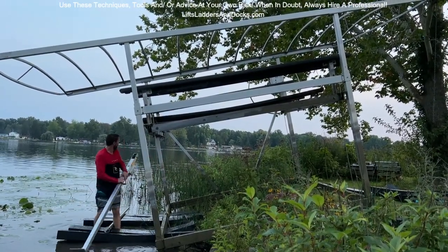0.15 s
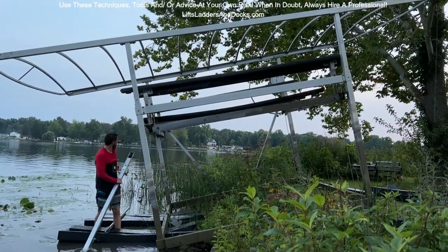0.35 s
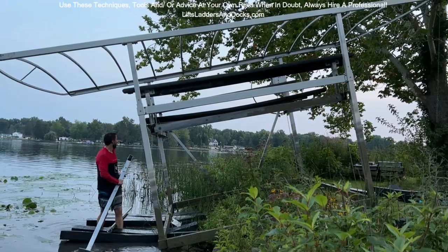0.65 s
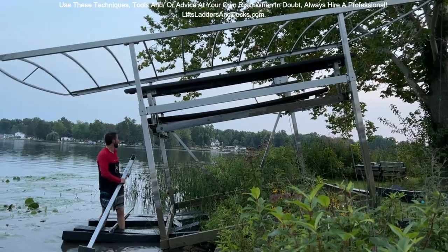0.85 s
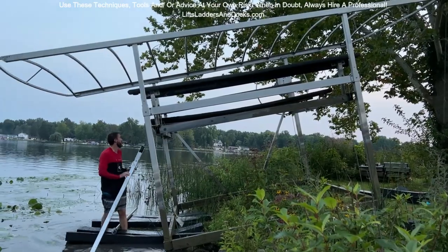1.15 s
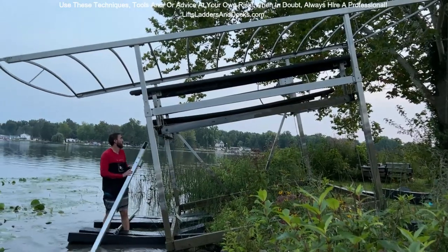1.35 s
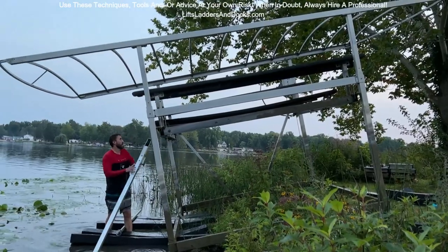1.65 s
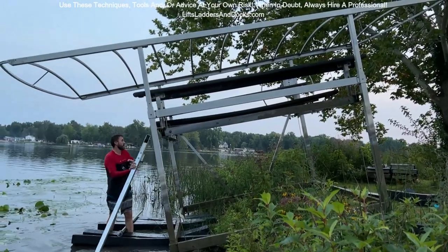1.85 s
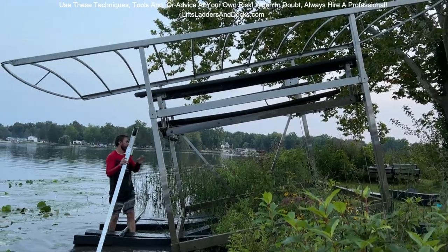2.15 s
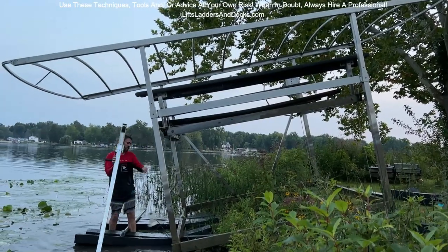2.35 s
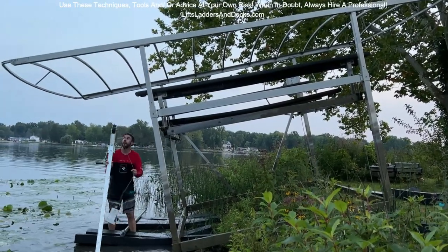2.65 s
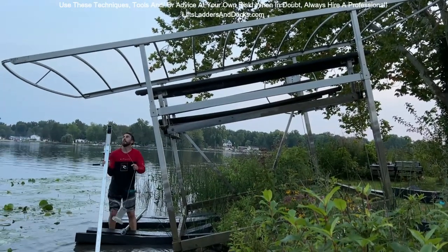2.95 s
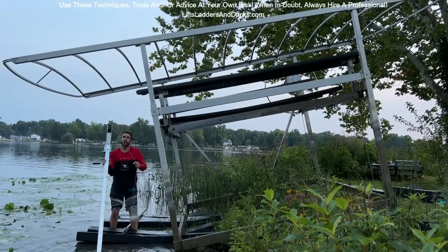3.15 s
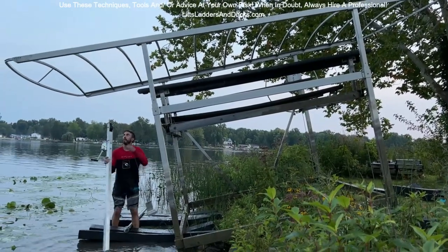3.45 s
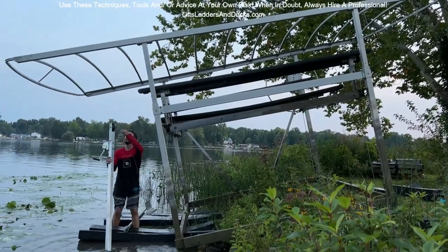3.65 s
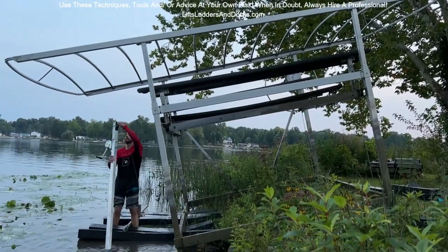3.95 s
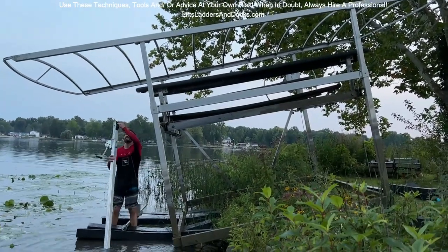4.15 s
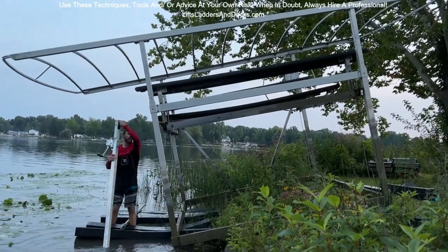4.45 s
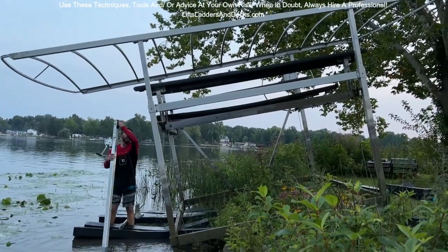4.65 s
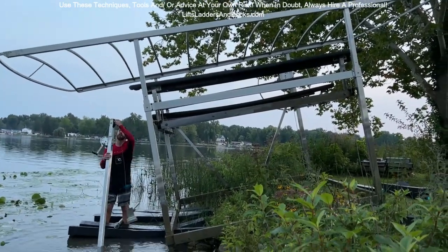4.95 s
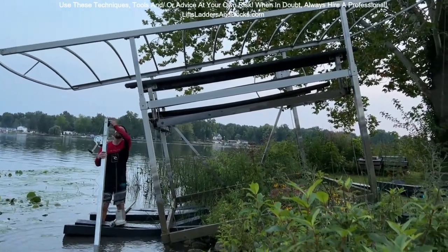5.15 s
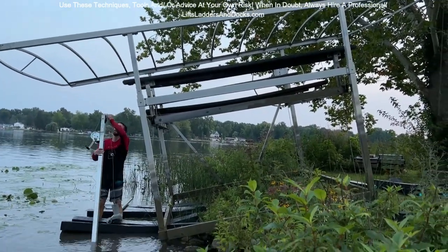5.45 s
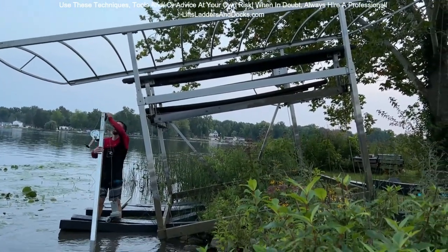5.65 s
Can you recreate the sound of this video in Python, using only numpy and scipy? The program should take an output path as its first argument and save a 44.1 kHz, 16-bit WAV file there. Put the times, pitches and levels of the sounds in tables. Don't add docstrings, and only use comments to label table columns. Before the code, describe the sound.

Sharp ringing metal clanks, short scrapes and a late bouncing rattle stand out against quiet high insect song and a low distant outdoor hum.

```python
import sys
import numpy as np
from scipy import signal
from scipy.fft import rfft, irfft, next_fast_len
from scipy.io import wavfile
from scipy.ndimage import uniform_filter1d

SR = 44100
rng = np.random.default_rng(int(sys.argv[2]) if len(sys.argv) > 2 else 0)


def volts(x):
    e = np.asarray(x, float) / 20
    return 10 ** e


def to_wav(s):
    ch = np.atleast_2d(s).T
    pcm = np.round(np.clip(ch, -1, 1) * 32767)
    wavfile.write(sys.argv[1], SR, pcm.astype(np.int16))


N = 255558
T = np.arange(N) / SR
THIRDS = 90 * 2 ** np.arange(0, 7.4, 1 / 3)
LEFT_RIGHT = np.array([[1], [-1]])


def shape(table, hz):
    f, v = np.transpose(table)
    return np.interp(np.log(hz), np.log(f), v)


def band(x, lo_hz, hi_hz, order=2):
    y = signal.sosfilt(signal.butter(order, [lo_hz, hi_hz], "band", fs=SR, output="sos"), x)
    return y / np.sqrt(np.mean(y ** 2))


def walk(rate):
    k = int(SR / rate)
    levels = np.repeat(rng.standard_normal(N // k + 1), k)
    return uniform_filter1d(uniform_filter1d(levels, k), k)[:N]


def swell(start, end, level_db, rise, fall):
    return volts(level_db - rise * np.maximum(start - T, 0) - fall * np.maximum(T - end, 0))


def gliding_noise(hz, rate):
    phase = 2 * np.pi * np.cumsum(hz) / SR
    noise = walk(rate) * np.sin(phase) + walk(rate) * np.cos(phase)
    return noise / np.std(noise)


# pitch in Hz, left minus right in dB, lead of the left in radians
PORT_SHADE = [(300, 0, .12), (800, -1.5, .15), (1400, 0, .8), (2000, 1, 1.2), (2800, 4, 1.3),
              (4500, 5, 1.2), (5500, 6.5, .6), (6500, 4, .1), (8500, 0, -.2), (13500, 0, -.2),
              (14500, 0, 2.4)]


def ports(x, lean):
    size = next_fast_len(N + 64)
    hz = (np.arange(size // 2 + 1) + 1) * SR / size
    at, shade_db, lead = np.transpose(PORT_SHADE)
    shade = volts(lean * shape(np.c_[at, shade_db], hz) / 2)
    turn = np.exp(.5j * lean * shape(np.c_[at, lead], hz)) * shade
    spec = rfft(x, size)
    return np.array([irfft(spec * turn, size)[:N], irfft(spec / turn, size)[:N]])


def shimmer():
    noises = [band(rng.standard_normal(2 * SR), f / 1.12, f * 1.12) for f in THIRDS]
    return np.array(noises) * np.sqrt(THIRDS / 1000)[:, None]


def strike(blows, modes, colour, decay, cloud, clear_db, late_db, late_ratio, lead):
    out = np.zeros(N + 2 * SR)
    count = len(modes)
    hz, db, t60 = np.transpose(modes)[:, :, None]
    chance = rng.random((len(blows), 1 + 3 * count))
    for (s, peak_db, tilt_db, contact, share), c in zip(blows, chance):
        share = np.clip(share, .05, 1.5)
        t = T[:int(SR * np.clip((peak_db + 70) / 55, .1, 1))]

        def tilt(f):
            return volts(tilt_db * np.log2(f / 1000))

        def rise(f):
            return 1 - np.exp(-t / max(contact, 1e-4) * 2 * np.sqrt(np.maximum(f / 800, .6)))

        spot = volts(3.67 * (c[1:1 + count, None] - 4.5))
        phase = 2 * np.pi * c[1 + count:1 + 2 * count, None]
        fade = rise(hz) * np.exp(-np.log(1000) * t / np.minimum(t60, 1.9) / share)
        beat_hz = 6 + 25 * c[1 + 2 * count:, None]
        beat = 1 + .65 * np.cos(2 * np.pi * beat_hz * t + 3 * phase)
        gain = volts(db + clear_db) * spot * tilt(hz)
        clear = np.sum(gain * beat * fade * np.sin(2 * np.pi * hz * t + phase), axis=0)
        short = shape(decay, THIRDS)[:, None] * share
        fall = np.exp(-np.log(1000) * t / short)
        fall = fall + volts(late_db) * np.exp(-np.log(1000) * t / short / late_ratio)
        start = int(c[0] * SR * .9)
        piece = cloud[:, start:start + len(t)] * fall * rise(THIRDS[:, None])
        ring = clear + (volts(shape(colour, THIRDS)) * tilt(THIRDS)) @ piece
        ring *= np.minimum((t[-1] - t) / .05, 1)
        loudest = np.sqrt(np.max(uniform_filter1d(ring[:4000] ** 2, 200)))
        at = int((s - lead) * SR)
        out[at:at + len(t)] += ring * volts(peak_db - 0.5) / loudest
    return out[:N]


# pitch in Hz, density in dB per Hz
SHORE_COLOUR = [(18, -35), (36, -7), (60, 7.5), (86, -2.5), (365, -22), (467, -11.5), (700, -30.5),
                (883, -24), (2730, -30), (3240, -35), (4680, -33.5), (6750, -45), (8020, -34), (10500, -43),
                (13600, -74), (22000, -120)]


def shore():
    out, common = 0, walk(1.3)
    for hz in 25 * 2 ** np.arange(0, 9, .5):
        mid, side = (band(rng.standard_normal(N), hz / 1.19, hz * 1.19) for _ in range(2))
        db = shape(SHORE_COLOUR, hz) + 10 * np.log10(hz) + 1.2 * common + 2.2 * walk(8)
        wide = np.clip(0.12 + hz / 1500, 0, .85)
        out = out + volts(db) * (mid + wide * side * LEFT_RIGHT)
    return out * volts(-50.5) / np.std(out)


# full strength from and to in seconds, level in dB,
# rise in dB per s, fall in dB per s
CRICKET_SONG = [
    (0, .45, -66, 60, 60),
    (.72, 2.34, -55.5, 55, 50),
    (3.2, 3.3, -81, 5, 5),
    (4.5, 5.1, -65, 16, 200),
    (5.3, 5.8, -62, 60, 30),
]
CICADA_SONG = [
    (3.12, 3.3, -62, 12, 60),
]
REED_BUG_SONG = [
    (1.0, 1.5, -60.5, 11.4, 18),
    (3.8, 4.02, -63, 190, 69),
    (4.33, 4.5, -66, 61, 36),
]
WARM_UP = [.074, .177, .306, 3.3293, 3.4516, 3.5748, 3.692, 3.8157, 3.9379, 4.0572, 4.2068, 4.3251, 4.4498]


def insects():
    def song(rows):
        return sum(swell(*row) for row in rows)

    noise = rng.standard_normal((4, N))
    level = song(CRICKET_SONG) * (1 + .25 * np.sin(2 * np.pi * 28 * T + 3 * walk(5.8)))
    for s in WARM_UP:
        early = min(start - s for start in (.31, 4.5) if start > s)
        age = np.maximum(T - s + 0.01, 0)
        stroke = (1 - np.exp(-age / .006)) * np.exp(-age / 0.035) / 2
        level += volts(-53 - 14 * early + 8.0) * stroke
    wing = band(noise[0], 11350, 13200, order=3) + volts(-3.0) * band(noise[1], 14200, 15700, order=3)
    cicada = song(CICADA_SONG) * band(noise[2], 4700, 5600) * volts(2 * walk(20.0))
    bug = song(REED_BUG_SONG) * band(noise[3], 8210, 11000, order=3) * volts(1.2 * walk(25.6))
    spread = level * volts(-5.5) * band(noise[3], 11300, 13200, order=3) * LEFT_RIGHT
    return ports(level * wing + cicada + bug, lean=2.0) + spread


# start in seconds, peak in dB, bubble pitch in Hz, ring in seconds, glide as
DRIPS = [
    (.013, -55, 830, .018, .03),
    (.144, -50, 1100, .014, -.1),
    (.81, -54, 850, .025, .55),
    (1.1, -41, 930, .02, .06),
    (2.53, -59, 1400, .02, .12),
    (3.662, -47, 330, .018, .05),
    (4.12, -58, 1080, .04, .06),
    (5.605, -60, 1195, .07, 0),
    (5.763, -49.5, 850, .011, .08),
]


def drops():
    out, t = np.zeros(N + 4410), T[:4410]
    for s, peak_db, hz, ring, glide in DRIPS:
        note = np.sin(2 * np.pi * hz * (t + glide * t ** 2 / ring / 2))
        fade = np.minimum(t / 0.0031, 1) * np.exp(-(t / ring) ** 2)
        at = int(s * SR)
        out[at:at + 4410] += volts(peak_db + 4.5) * note * fade
    return out[:N]


# start in seconds, peak in dB, treble tilt in dB per octave,
# contact in seconds, ring share 0-1
NUDGE_BLOWS = [(.092, -49.5, -5, 0.012, 0.38), (.188, -49.5, 7, 0.0031, 0.42),
               (.305, -45.5, 13.5, 0.0065, 0.42), (.349, -45.5, 12, 0.0033, 0.15),
               (.949, -48.5, 3.5, 0.0025, 0.99), (1.127, -31.5, -3.5, 0.0011, 0.13),
               (1.14, -39, 9.5, 0.0032, 0.69), (1.189, -32, -2, 0.001, 0.89),
               (1.6, -35.5, -7, 0.0038, 0.22), (1.666, -44.5, -1.5, 0.001, 0.2),
               (1.696, -33.5, 0.5, 0.004, 0.86), (1.96, -37, -3, 0.015, 0.38)]
# pitch in Hz, level in dB,
# t60 in seconds
BRIGHT_END = [(133, -15, .59), (265, -17, .63), (608, 1, .26), (662, -1, .33), (690, -18, .44),
              (786, -21, 1.2), (883, -6, .5), (996, -16, .8), (1098, -18, .65), (1179, -11, .4),
              (1330, 0, .18), (1400, -7, .3), (1604, -8, .24), (1733, -10, .27), (2169, -12, .2)]
WHOLE_BEAM = [(361, -23, 1.8), (372, -28, 1.4), (426, -30, 1.5), (441, -27, 1.7), (716, -2, .15)]
# pitch in Hz, density in dB per Hz
BRIGHT_END_COLOUR = [(53, -55), (90, -27.5), (515, -9.5), (639, -5), (1120, -14), (1330, -10.5),
                     (2710, -26.5), (5630, -33), (9240, -53), (10100, -81), (11500, -49), (15500, -61)]
# pitch in Hz, t60 in seconds
BEAM_FADE = [(100, 0.32), (400, 0.21), (800, 0.24), (2000, 0.14), (5000, 0.086), (12000, 0.05)]


def nudges(cloud):
    return strike(NUDGE_BLOWS, BRIGHT_END + WHOLE_BEAM, BRIGHT_END_COLOUR, BEAM_FADE, cloud,
                  clear_db=3.5, late_db=-7.0, late_ratio=8.9, lead=.0015)


# start in seconds, level in dB, pitch in Hz,
# held in seconds, t60 in seconds
TOUCHES = [(.404, -12, 617, .041, .03), (5.2, -49, 2865, .05, 1.5), (2.75, -55, 2725, .1, 1.2),
           (.144, -54, 1300, .006, .04), (5.6, -58, 1195, .06, .1), (5.5, -55, 1700, .01, .04),
           (1.12, -50, 2400, .01, .05), (1.17, -48, 1650, .012, .05), (1.42, -42, 790, .065, .08),
           (1.6, -40, 620, .02, .1), (1.598, -50, 1800, .004, .06), (1.666, -43, 680, .008, .05),
           (1.698, -34, 660, .008, .03), (1.712, -32, 660, .01, .06), (1.697, -46, 4900, .004, .08),
           (1.735, -42, 595, .065, .08), (1.85, -46, 272, .03, .08), (1.9, -45, 272, .03, .08),
           (1.875, -50, 3560, .02, .12), (1.9, -44, 540, .02, .06), (1.935, -42, 485, .07, .1),
           (3.218, -58, 3050, .008, .05), (4.17, -59, 1090, .04, .06), (4.26, -60, 1950, .05, .06),
           (4.2, -58, 300, .06, .1), (1.128, -42, 480, .004, .04), (1.19, -42, 760, .004, .04),
           (4.158, -56, 1480, .008, .04), (4.2, -58, 1560, .015, .05), (4.335, -56, 800, .01, .05),
           (4.347, -46, 2750, .005, .07), (4.347, -51, 1800, .005, .07), (4.454, -58, 2800, .006, .05),
           (4.987, -53, 2800, .005, .05), (5.1492, -22, 1300, .0005, .01), (5.194, -26, 2000, .002, .02),
           (5.259, -38, 4750, .003, .04), (5.36, -38, 960, .006, .04), (5.366, -39, 398, .014, .1)]


def held():
    out, t = np.zeros(N + SR), T[:SR // 2]
    for s, db, hz, hold, t60 in TOUCHES:
        rise = np.minimum(t * hz / 2, 1)
        fade = rise * np.exp(-np.log(1000) * np.maximum(t - hold, 0) / max(t60, .005))
        at = int(s * SR)
        out[at:at + len(t)] += volts(db + 3) * fade * np.sin(2 * np.pi * hz * t)
    return out[:N] * volts(1.5 * walk(150))


# start in seconds, peak in dB, treble tilt in dB per octave,
# contact in seconds, ring share 0-1
FIRST_BLOWS = [
    (0.404, -9, 1.5, 0.0093, 1.0),
    (.419, -17, 3., .002, .2),
    (.434, -17, 3., .002, .2),
]
# pitch in Hz, level in dB, t60 in seconds
DULL_END = [(137, -24, .37), (366, -3, .25), (426, -8, .2), (530, -10, .25), (596, -15, .59),
            (646, -26, 1.3), (775, -18, .55), (883, -16, .54), (904, -3, .21), (942, -6, .22),
            (985, -25, .9), (1055, -15, .4), (1330, -17, .36), (1642, -14, .35), (1803, -21, .22),
            (2256, -19, .23)]
# pitch in Hz, density in dB per Hz
DULL_END_COLOUR = [(53, -58), (90, -24), (398, -16), (473, -4.5), (612, -10), (810, -17.5), (922, -14),
                   (1550, -24.5), (4350, -30), (8300, -44), (10300, -58.5), (11500, -48.5), (15500, -64)]


def first_blow(cloud):
    return strike(FIRST_BLOWS, DULL_END + WHOLE_BEAM, DULL_END_COLOUR, BEAM_FADE, cloud,
                  clear_db=10.5, late_db=-21, late_ratio=7.2, lead=.003)


# pressed from and to in seconds, level in dB, treble in dB,
# modes favoured by the contact spot in Hz
DRAGS = [
    (1.12, 1.21, -48, -12, 700),
    (1.46, 1.56, -49, -17, 450),
    (1.604, 1.615, -47, -22, 600),
    (1.7, 1.725, -41, -14, 800),
    (1.72, 1.8, -43, -12, 800),
    (1.82, 1.92, -46, -11, 500),
    (1.93, 1.99, -44, -17, 900),
]


def drag():
    size = volts(2.5 * np.minimum(rng.exponential(size=N), 4))
    slips = rng.random(N) < .06
    grains = rng.standard_normal(N) * size * slips * volts(5 * walk(45))
    # pitch in Hz, half width in Hz, level in dB
    modes = np.array([(277, 10.0, -6.0), (377, 11, -18), (453.7, 3.4, -1.0), (490, 30, -3.0),
                      (617.0, 16, 0.5), (779, 7.1, 4.0), (877, 29, 5.0), (1420, 60, 3.5),
                      (1686, 21, 10.0), (687, 33, -11.0), (1100, 130, -29)])
    rings = np.array([volts(db) * band(grains, f - w, f + w, order=1) for f, w, db in modes])
    grit = band(grains, 1240, 4500)
    grit += volts(-29.5) * band(grains, 4600, 4700, order=1)
    grit += volts(-15) * band(grains, 3550, 3575, order=1)
    grit += volts(-37.0) * band(grains, 6220, 6270, order=1)
    out = 0
    for start, end, db, treble_db, spot_hz in DRAGS:
        octaves = np.abs(np.log2(modes[:, 0] / spot_hz))
        body = volts(-13 * octaves) @ rings
        press = swell(start, end, db, rise=902, fall=278)
        out = out + press * (body / np.std(body) + volts(treble_db) * grit)
    return out


# start in seconds, peak in dB, treble tilt in dB per octave,
# contact in seconds, ring share 0-1
SECOND_BLOWS = [
    (1.274, -13, 0.1, 0.0063, 1.0),
]


def second_blow(cloud):
    return strike(SECOND_BLOWS, BRIGHT_END + WHOLE_BEAM, BRIGHT_END_COLOUR, BEAM_FADE, cloud,
                  clear_db=9.0, late_db=-15.5, late_ratio=5.36, lead=0.004)


# full strength from and to in seconds, level in dB
GUSTS = [
    (2.216, 2.618, -63),
    (3.281, 3.582, -63),
    (3.874, 4.224, -62),
    (4.7, 4.771, -62),
]


def drone():
    hum = band(rng.standard_normal(N), 448 - 38.6, 448 + 38.6)
    return hum * sum(swell(*row, rise=86.5, fall=76.5) for row in GUSTS)


# start in seconds, peak in dB, treble tilt in dB per octave,
# contact in seconds, ring share 0-1
CLANK_BLOWS = [
    (2.688, -8.5, 0.011, 0.0032, 0.92),
]
# pitch in Hz, level in dB, t60 in seconds
PIPE_MODES = [(1003, 1, 0.22), (1071, -14, 0.57), (1346, -19.5, 0.27), (1486, -19, 0.55), (1526, 4, 0.14),
              (1610, -9, 0.52), (2689, -5, 0.24), (2853, 1, 0.14), (2960, -13, 0.22), (2905, -7, 0.13),
              (3365, -20, 0.22), (3563, -7, 0.2), (4463, -11, 0.19), (4780, -28, 0.3), (5368, -12, 0.22),
              (6160, -30, 0.44), (7192, -25, 0.28), (7800, -18, 0.19), (8000, -27.5, 0.25),
              (8802, -38.5, 0.41),
              (2764, -3, .15), (2700, -26, .8), (2738, -29, .9), (2790, -31, .8), (3590, -26, .5),
                   (705, -6, .07), (957, -8, .09), (1050, -27, .6), (1630, -25, .6), (2013, -17, .4),
                   (3095, -15, .25)]
# pitch in Hz, density in dB per Hz
PIPE_SHIMMER = [(71, -63.5), (120, -34), (300, -29), (420, -16), (563, -13.5), (995, -7), (1270, -18),
                (1560, -6.5), (1830, -19.5), (2300, -17), (2870, -13), (8250, -28.5), (10100, -47),
                (11700, -26), (14000, -53.5), (15500, -32)]
# pitch in Hz, t60 in seconds
PIPE_FADE = [(150, 0.19), (500, 0.059), (1200, 0.079), (3000, 0.087), (6000, 0.11), (12000, 0.069)]


def pipe_clank(cloud):
    return strike(CLANK_BLOWS, PIPE_MODES, PIPE_SHIMMER, PIPE_FADE, cloud,
                  clear_db=6.5, late_db=-21.0, late_ratio=6.4, lead=0.001)


# start in seconds, peak in dB,
# treble tilt in dB per octave, contact in seconds, ring share 0-1
TICK_BLOWS = [
    (3.22, -57.5, -0.3, 0.0025, 0.59),
    (3.487, -63.5, -13, 0.0017, 0.44),
    (3.636, -48.5, -1.1, 0.0016, 0.085),
    (4.346, -42.5, -1.8, 0.0024, 0.77),
    (4.458, -49, -0.9, 0.0023, 1),
    (4.987, -51.5, 2.5, 0.0015, 0.28),
]
THUD_BLOWS = [
    (3.637, -33, -10.5, 0.0028, 0.15),
    (4.818, -45, -5.5, 0.0036, 0.35),
    (4.912, -43.5, -16.5, 0.0027, 0.47),
    (5.037, -37.5, -16, 0.0025, 0.53),
    (5.596, -45.5, -5.5, 0.005, 0.66),
]
FITTING_PITCH = [398, 866, 1020, 1200, 1560, 2010, 2121, 2853, 2915, 3354, 3564, 4470, 4800, 6325, 7190,
                 8680]
# level in dB, t60 in seconds
FITTING_MODE_RING = [(-15, 0.14), (0, 0.2), (4.5, 0.062), (-9, 0.33), (-5, 0.12), (-8.5, .1), (-9, 0.3),
                     (-10, 0.93), (-14.5, 0.53), (-1, 0.1), (-7, 0.37), (-1.5, 0.11), (-4, 0.084),
                     (9.5, 0.054), (-5.5, 0.081), (-5, 0.073)]
# pitch in Hz, density in dB per Hz
FITTING_SHIMMER = [(71, -47), (120, -15), (407, -5.5), (796, -12), (863, 7), (1080, -38), (2030, 2.5),
                   (2240, -14.5), (2870, -12.5), (6330, -20.5), (12400, -25.5), (13200, -55), (15500, -70)]
# pitch in Hz, t60 in seconds
FITTING_FADE = [(150, 0.12), (500, 0.15), (1200, 0.125), (3000, 0.24), (6000, 0.17), (12000, 0.2)]
FITTING_MODES = [(hz, *ring) for hz, ring in zip(FITTING_PITCH, FITTING_MODE_RING)]


def fitting_ticks(cloud):
    return strike(TICK_BLOWS + THUD_BLOWS, FITTING_MODES, FITTING_SHIMMER, FITTING_FADE, cloud,
                  clear_db=-9.0, late_db=-11, late_ratio=2.8, lead=0.00068)


# rubbed from and to in seconds, level in dB,
# tube resonance from and to in Hz
RUBS = [
    (3.75, 3.78, -63, 1650, 1500),
    (3.9, 4.0, -64, 800, 900),
    (4.11, 4.3, -55, 1120, 950),
    (4.35, 4.39, -54, 1850, 1800),
    (5.51, 5.62, -53, 1780, 1230),
]


def rub():
    rows = np.array(RUBS)
    tube = gliding_noise(np.interp(T, rows[:, :2].ravel(), rows[:, 3:].ravel()), rate=900)
    cloth = band(rng.standard_normal(N) * volts(6.6 * walk(60)), 210, 2500)
    grip = sum(swell(start, end, db, rise=130, fall=159) for start, end, db in rows[:, :3])
    return grip * (volts(-4.5) * tube + volts(-2) * cloth)


def slide():
    start_s, stop_s = 4.49, 4.92
    hiss = gliding_noise(2010 - 260 * (T - start_s), rate=520)
    moving = swell(start_s, 4.6, -58, rise=120, fall=10)
    return moving * swell(0, stop_s, 0, rise=0, fall=258) * hiss


# start in seconds, peak in dB, treble tilt in dB per octave,
# contact in seconds, ring share 0-1
RATTLE_BLOWS = [
    (5.149, -19.5, -0.24, 0.0016, 1),
    (5.193, -19.5, -0.3, 0.00052, 0.54),
    (5.219, -38.5, -7, 0.00089, 0.99),
    (5.259, -28, 2, 0.00086, 0.74),
    (5.36, -28.5, -3.5, 0.00071, 0.66),
    (5.498, -48.5, 6, 0.001, 0.49),
]


def fitting_rattle(cloud):
    return strike(RATTLE_BLOWS, FITTING_MODES, FITTING_SHIMMER, FITTING_FADE, cloud,
                  clear_db=14.5, late_db=-15, late_ratio=3.9, lead=0.00044)


def bank_scatter(metal):
    highpass = signal.butter(1, 1100, "high", fs=SR, output="sos")
    echo = signal.sosfilt(highpass, rng.standard_normal((2, 6000)))
    echo *= np.exp(-T[:6000] / 0.024)
    return signal.fftconvolve(metal, echo / np.linalg.norm(echo[0]), axes=1)[:, :N]


def scene():
    cloud = shimmer()
    knocks = nudges(cloud) + first_blow(cloud) + second_blow(cloud)
    frame = ports(knocks + drag() + drops() + held(), lean=0.97)
    pipe = ports(pipe_clank(cloud), lean=1.12)
    fitting = ports(fitting_ticks(cloud) + fitting_rattle(cloud) + rub() + slide(), lean=1.2)
    metal = frame + pipe + fitting
    return metal + volts(-5.5) * bank_scatter(metal) + insects() + shore() + drone()


def band_limit(x):
    return signal.sosfilt(signal.butter(12, 15900, fs=SR, output="sos"), x)


# pitch in Hz, gain in dB
MICROPHONE = [(20, -26), (48, 0), (9400, 0), (9800, -24), (10400, -24), (10900, 0), (13450, 0),
              (13800, -30), (14150, 0)]


def record(dry):
    size = next_fast_len(N)
    hz = (np.arange(size // 2 + 1) + 1) * SR / size
    x = irfft(rfft(dry, size) * volts(shape(MICROPHONE, hz)), size)[:, :N]
    mix = np.tanh(0.51 * x) / 0.66
    return band_limit(mix)


dry = scene()
out = record(dry)
to_wav(out)
```